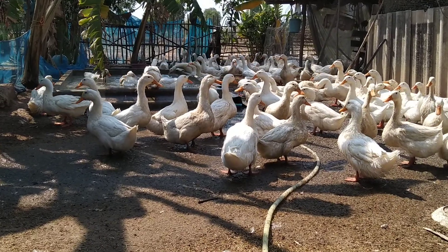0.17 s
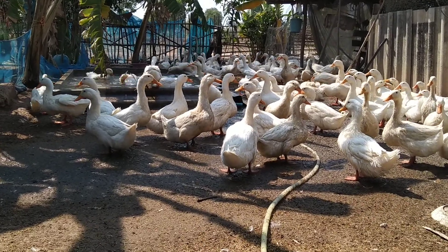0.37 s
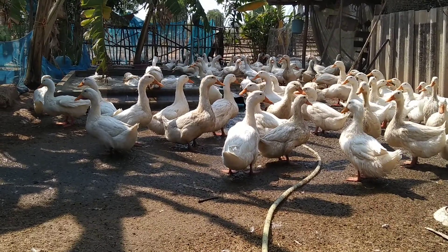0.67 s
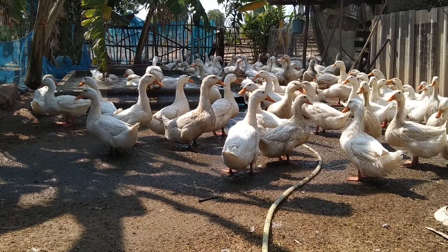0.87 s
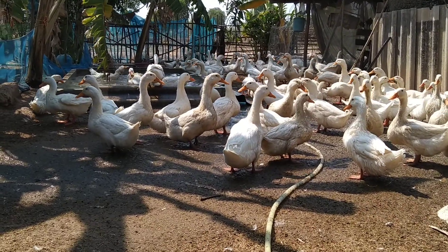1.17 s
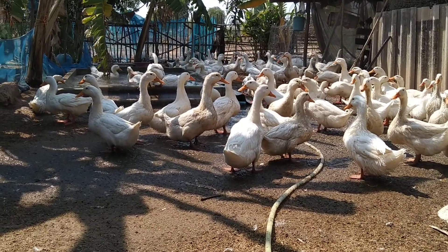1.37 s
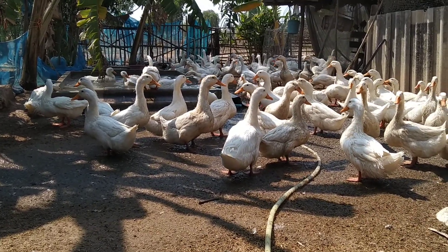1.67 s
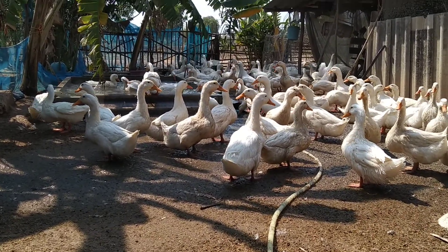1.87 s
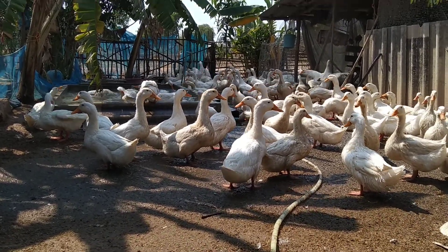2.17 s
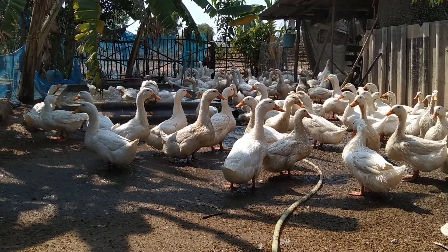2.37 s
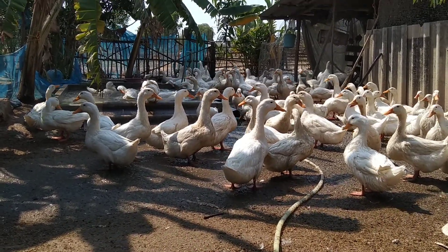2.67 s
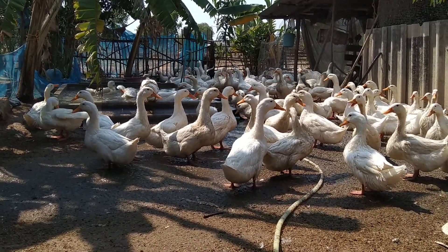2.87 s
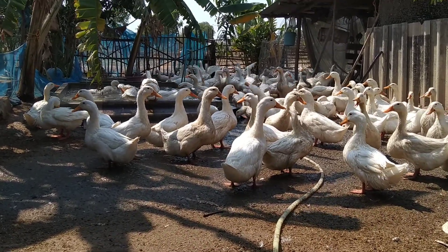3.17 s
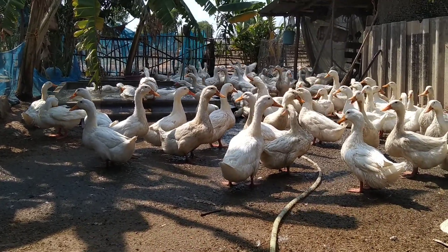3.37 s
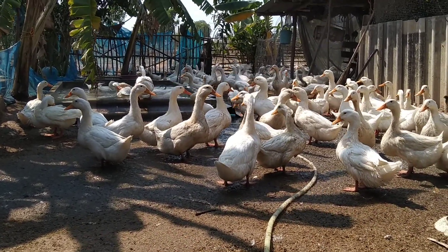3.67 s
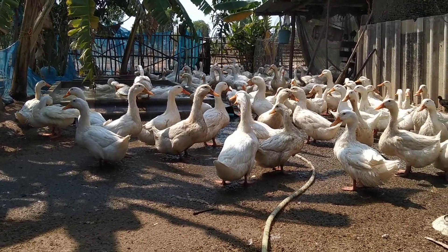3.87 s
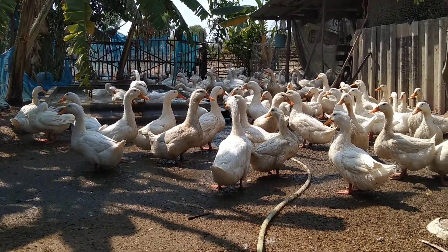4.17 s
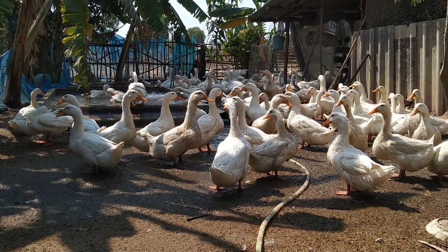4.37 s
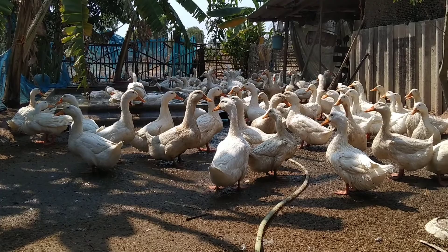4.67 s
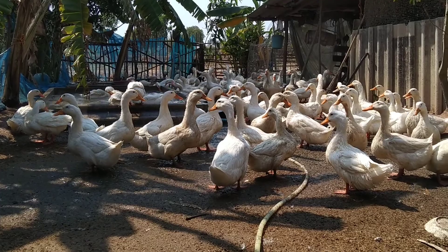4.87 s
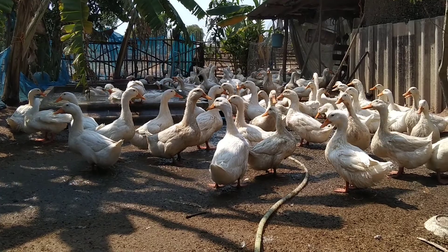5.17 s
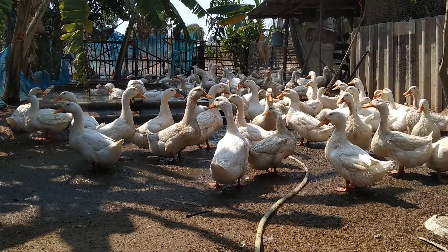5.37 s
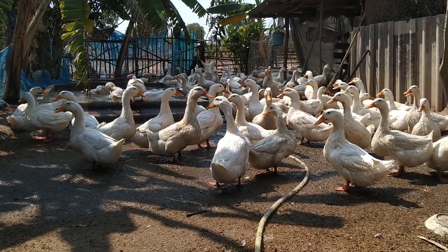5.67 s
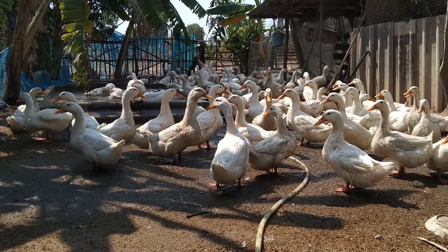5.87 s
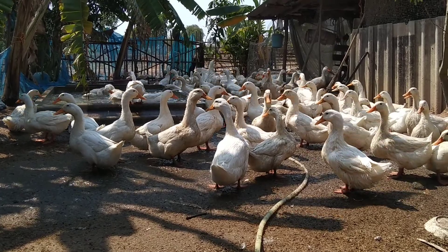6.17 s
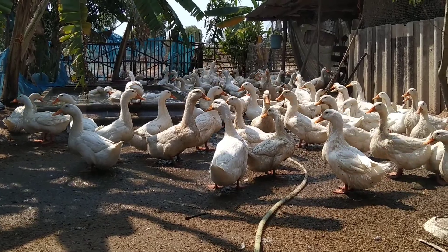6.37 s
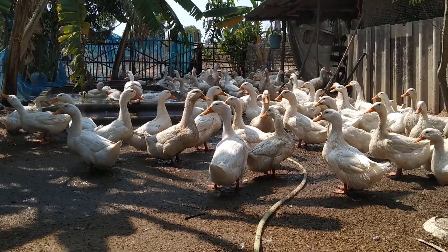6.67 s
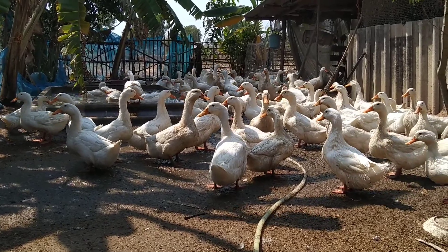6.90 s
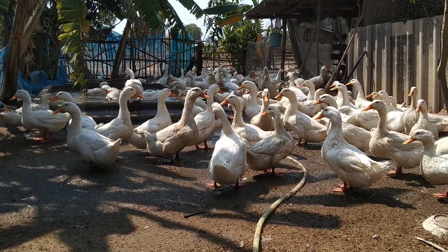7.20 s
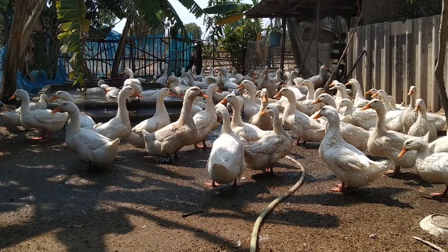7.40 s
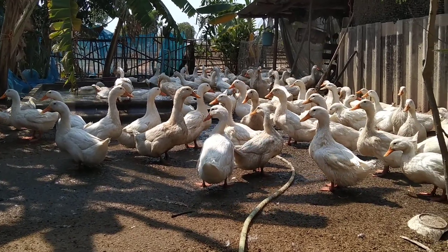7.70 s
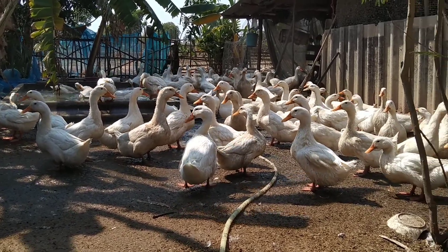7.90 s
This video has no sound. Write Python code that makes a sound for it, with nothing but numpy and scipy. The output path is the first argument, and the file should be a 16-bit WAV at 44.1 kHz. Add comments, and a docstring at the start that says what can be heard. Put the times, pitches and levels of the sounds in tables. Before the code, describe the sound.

Dense hoarse duck chatter, rough and nasal, starts at full strength. Grunts, soft honks and quick squeals dot it, then it drops to faint whistling for a moment and resumes. The second half is patchier, with buzzing calls, tiny chirps and a loud squeal before strong quacks return. Mono phone sound outdoors, mid-heavy with little bass or top, brief echoes and far flock babble nearly erased by noise suppression.

```python
"""Hoarse quacks and low grunts of a near flock of ducks in a farmyard, heard through a phone.
Pulsed voices ring throat and chest resonances; air hisses past the bills. Tones make murmurs, whistled notes,
honks and squawks; resonant noise makes chirrs and chirps; short noise bursts make bill clicks and knocks.
Behind them far birds babble steadily as coloured puffs of air; near calls echo off fences and a shed.
The phone's noise suppressor takes the babble for noise and carves most of it away."""
import sys
import numpy as np
from scipy import signal
from scipy.fft import rfft, irfft, next_fast_len
from scipy.io import wavfile
from scipy.ndimage import uniform_filter1d

SR = 44100
rng = np.random.default_rng(int(sys.argv[2]) if len(sys.argv) > 2 else 0)


def unload_wav(signal):
    """Save mono or channel-first audio to the path in sys.argv[1] as 16-bit WAV at rate SR, clipped to [-1, 1]."""
    wavfile.write(
        sys.argv[1],
        SR,
        np.round(np.clip(np.atleast_2d(signal).T, -1, 1) * 32767).astype(np.int16),
    )


N = 354563


def gain_of(db):
    """Decibels to an amplitude factor."""
    return 10 ** (np.asarray(db) / 20)


def evened(x):
    """Scales to rms 1."""
    return x / np.sqrt(np.mean(x ** 2) + 1e-20)


def levelled(x, size=3000):
    """Holds the running rms near 1, leaving only the fast grain."""
    power = uniform_filter1d(uniform_filter1d(x ** 2, size), size)
    return x / np.sqrt(abs(power) + 1e-20)


def curves(rows):
    """Sample times, then each further column joined by straight lines."""
    time_s, *columns = np.transpose(rows)
    t = np.arange(round(time_s[0] * SR), min(round(time_s[-1] * SR), N)) / SR
    return t, *(np.interp(t, time_s, column) for column in columns)


def add(mix, start_s, sound):
    """Mixes a sound in at start_s, cut at the end of the mix."""
    part = mix[round(start_s * SR):][:len(sound)]
    part += sound[:len(part)]


def drift(size):
    """Slow random curve of rms 1, smoothed twice over size samples."""
    step = 20  # samples per coarse point
    coarse = rng.standard_normal(N // step + 2)
    coarse = uniform_filter1d(uniform_filter1d(coarse, size // step), size // step)
    return np.interp(np.arange(N) / step, np.arange(len(coarse)), evened(coarse))


def colour(x, points):
    """Filters by a gain curve (frequency [Hz], gain [dB]) on a log-frequency axis."""
    hz, db = np.transpose(points)
    size = next_fast_len(N)
    bin_hz = np.fft.rfftfreq(size, 1 / SR) + 1
    gain = gain_of(np.interp(np.log(bin_hz), np.log(hz), db))
    return irfft(rfft(x, size) * gain, size)[:N]


def band(x, lo_hz, hi_hz):
    """Steep band-pass."""
    return signal.sosfilt(signal.butter(4, [lo_hz, hi_hz], "band", fs=SR, output="sos"), x)


def resonate(x, hz, width_hz):
    """Moving resonance: shifts hz down to zero, smooths with a double pole, shifts back."""
    turn = np.exp(2j * np.pi * np.cumsum(hz * np.ones(len(x))) / SR)
    r = np.exp(-np.pi * width_hz / SR)
    smooth = signal.lfilter([(1 - r) ** 2], [1, -2 * r, r * r], x * turn.conj() + 1e-18)
    return 2 * (turn * smooth).real


def ring(drive, hz, modes, fickle_db):
    """Narrow modes on a common frequency hz; each wanders in pitch and swells and fades at random."""
    out = np.zeros(N)
    for k, (factor, width_hz, db) in enumerate(modes):
        wander = 1 + .018 * drift(size=3000)
        gain = gain_of(db + fickle_db * drift(size=900))
        out += (-1) ** k * gain * evened(resonate(drive, hz * factor * wander, width_hz))
    return out


def syrinx(hz, rough, count):
    """Birds pulsing at once, rough = share of air puffs; the first leads, others come and go."""
    out = np.zeros(N)
    for k in range(count):
        jitter = 1 + .1 * k * drift(size=6000) + .06 * drift(size=300)
        turns = np.cumsum(hz * 1.37 ** k * jitter) / SR
        pulses = np.diff(np.floor(turns), prepend=0) * gain_of(1.6 * rng.standard_normal(N))
        puffs = np.exp(-(turns % 1) / .35) * rng.standard_normal(N)
        presence = gain_of(k * (3 * drift(size=4000) - 2.5))
        out += presence * ((1 - rough) * evened(pulses) + rough * evened(puffs))
    return out


def scattered(x):
    """Blurs each pulse with short random delays whose gains drift."""
    out = x.copy()
    for lag in np.arange(30, 330, 45):  # samples
        delay_gain = gain_of(-5 - 60 * lag / SR / .04) * drift(size=1200)
        out += delay_gain * np.roll(x, lag + rng.integers(40))
    return out


def whistle(t, hz, partials):
    """Partials (multiple, level [dB]) on a wavering pitch, with an uneven throb."""
    pitch_waver, level_waver = uniform_filter1d(rng.standard_normal((2, len(t))), 250, axis=1) * 16
    turns = np.cumsum(hz * (1 + 0.01 * pitch_waver)) / SR
    tone = sum(gain_of(db) * np.sqrt(2) * np.sin(2 * np.pi * k * turns) for k, db in partials)
    return tone * (1 + 0.21 * level_waver) * signal.windows.tukey(len(t), .3)


def call(length_s, start_db, end_db):
    """Times, share of the length, and a level bend in dB through 0 at 45 % of the length."""
    t = np.arange(0, length_s, 1 / SR)
    share = t / length_s
    return t, share, np.interp(share, [0, 0.45, 1], [start_db, 0, end_db])


def spoken(calls):
    """Attack, hold and fade: power-weighted resonance [Hz], then summed effort and side-layer gains."""
    power = np.full((len(calls[0]) - 5, N), 1e-12)  # effort, then one row per side layer
    pull = np.full(N, 1e-12 * calls[0][5])
    for start_s, attack_s, hold_s, effort_db, fade_db_per_s, hz, *sides_db in calls:
        t = np.arange(0, attack_s + hold_s + 70 / fade_db_per_s, 1 / SR)
        rise = np.minimum(t / max(attack_s, .006), 1) ** .75
        fade_db = fade_db_per_s * np.maximum(t - attack_s - hold_s, 0)
        shape = (rise * gain_of(effort_db - fade_db)) ** 2
        add(pull, start_s, hz * shape)
        for layer, db in zip(power, [0, *sides_db]):
            add(layer, start_s, shape * gain_of(2 * db))
    return uniform_filter1d(pull / power[0], size=300), *np.sqrt(power)


# far-flock spectrum: (frequency [Hz], filter gain [dB])
BABBLE_SPECTRUM = [(59, -55), (100, -31), (283, -10.5), (642, -9.5), (1510, -9), (4520, -17), (7330, -21.5),
                   (8500, -54), (11000, -55.5), (18700, -120)]
BABBLE_RMS_DB = -54.5


def babble():
    """Far birds blur into steady, coloured puffs of air."""
    far = colour(levelled(syrinx(90, 0.99, count=2)), BABBLE_SPECTRUM)
    return gain_of(BABBLE_RMS_DB) * evened(far)


def yard(x):
    """Sparse echoes of random sign from fences and the shed."""
    t60_s = .28
    at = np.arange(400, 12000, 20) + rng.integers(0, 20, 580)  # samples
    taps = np.zeros(12100)
    taps[at] = rng.choice([-1., 1.], len(at)) * gain_of(-60 * at / SR / t60_s)
    return signal.oaconvolve(x, taps / np.linalg.norm(taps))[:N]


def snaps(rows, lo_hz, hi_hz):
    """Band-passed noise bursts with a 22 ms 60 dB decay, each scaled to its peak."""
    out, t = np.zeros(N), np.arange(1600) / SR
    for start_s, peak_db in rows:
        snap = band(rng.standard_normal(len(t)) * gain_of(-60 * t / .022), lo_hz, hi_hz)
        add(out, start_s, gain_of(peak_db) * snap / abs(snap).max())
    return out


# bills snapping: (time [s], peak [dB])
BILL_CLICKS = [(0.3713, -38), (0.9707, -40), (1.0876, -38), (1.4077, -41), (2.3227, -39.5), (2.4429, -36.5),
               (3.033, -33), (4.6383, -36), (4.7232, -37.5), (4.8694, -33.5), (5.016, -42), (5.0958, -42),
               (7.849, -44), (7.9696, -37.5)]


def clicks():
    """Snapping bills: high bursts."""
    return snaps(BILL_CLICKS, 5000, 9000)


# dull wide snaps: (time [s], peak [dB])
DULL_KNOCKS = [(2.845, -50), (2.871, -44), (4.775, -39.5), (4.955, -36), (5.517, -38)]


def knocks():
    """Dull snaps: lower and wider bursts."""
    return snaps(DULL_KNOCKS, 250, 5000)


# small bird's chirps: (time [s], nominal level [dB], played 10 dB lower)
CHIRPS = [(5.764, -44), (5.831, -45), (5.895, -50.5), (5.907, -45)]


def tweets():
    """A small bird's chirps: a falling tone in resonant noise, fading fast."""
    out, t = np.zeros(N), np.arange(1600) / SR
    for start_s, db in CHIRPS:
        hz = 6000 + 1150 * np.exp(-t / 0.019)
        rasp = evened(resonate(rng.standard_normal(len(t)), hz, 500)) * signal.windows.tukey(len(t), .3)
        add(out, start_s, gain_of(db - 10 - 260 * t) * (whistle(t, hz, [(0.98, 0)]) + 2.7 * rasp))
    return out


# clear low calls: (start [s], length [s], first pitch [Hz], last pitch [Hz], nominal level [dB])
MURMUR_CALLS = [(3.455, 0.14, 168.8, 170.8, -61.5), (5.423, 0.22, 272.8, 260.7, -57.5),
                (5.592, 0.28, 335.4, 331.3, -66.5)]
# nearly closed bill: (frequency [Hz], partial level [dB])
BILL_COLOUR = [(170, -36.5), (340, -3), (700, -8.5), (1050, -5.5), (1450, 3.5), (1900, -7.5), (2400, -20.5),
               (3000, -17.5)]


def murmurs():
    """Steady harmonic stacks through a nearly closed bill, each partial with a random level offset."""
    out, (colour_hz, colour_db) = np.zeros(N), np.transpose(BILL_COLOUR)
    for start_s, length_s, first_hz, last_hz, db in MURMUR_CALLS:
        t, share, bend_db = call(length_s, 1.5, -1.2)
        partials = []
        for k in range(1, 17):
            if k * first_hz < 3000:
                partial_db = np.interp(k * first_hz, colour_hz, colour_db) + 3 * rng.standard_normal()
                partials.append((k, partial_db))
        hz = first_hz + (last_hz - first_hz) * share
        add(out, start_s, gain_of(db + bend_db) * whistle(t, hz, partials))
    return out


# honks: (start [s], length [s], top fundamental [Hz], nominal level [dB])
HONK_CALLS = [(1.796, 0.11, 1034, -61), (1.934, 0.14, 1037, -54), (2.111, 0.19, 998, -58.5)]
# honk spectrum, no fundamental: (multiple, level [dB])
HONK_STACK = [(2, 5), (3, -26.5), (4, -1), (5, 3), (6, -40), (7, 7)]


def honks():
    """Upper partials on an arched pitch, swelling and dying away."""
    out = np.zeros(N)
    for start_s, length_s, top_hz, db in HONK_CALLS:
        t, share, swell_db = call(length_s, -10.5, -28.5)
        arch = 1 - 0.042 * (2 * share - 1) ** 2  # 4.2 % lower at both ends
        add(out, start_s, gain_of(db + swell_db) * whistle(t, top_hz * arch, HONK_STACK))
    return out


# whistled notes: (start [s], length [s], first pitch [Hz], last pitch [Hz],
#                  level at 45 % of the length [dB], second partial re first [dB])
WHISTLED_NOTES = [ (2.087, 0.018, 3234, 2424, -50.5, -32), (2.131, 0.03, 308, 279, -43.5, -14.5),
                  (2.701, 0.0052, 2560, 3160, -45.5, -41.5), (2.672, 0.014, 1730, 1700, -48.5, -33.5),
                  (2.797, 0.03, 990, 820, -46, -23), (2.83, 0.041, 780, 855, -41.5, -30),
                  (3.301, 0.098, 3270, 3310, -64.5, -10.5), (3.242, 0.12, 808, 780, -59.5, -29),
                  (3.304, 0.082, 3600, 3510, -64, -24), (3.47, 0.15, 1880, 1837, -60, -34),
                  (3.579, .11, 1050, 1035, -59, -28), (3.681, 0.098, 3250, 3240, -64.5, -36),
                  (3.362, 0.3, 343.8, 299, -64, -10.5), (3.449, 0.12, 997, 1025, -59.5, -19),
                  (3.466, 0.13, 1468, 1523, -51, -39.5), (3.501, 0.14, 3240, 3340, -66, -41),
                  (3.629, 0.082, 2823, 2813, -54.5, -8.5), (3.585, 0.12, 514, 556, -63, -3),
                  (3.778, 0.024, 760, 743, -60.5, -9), (3.681, 0.078, 1070, 1282, -56, -19.5),
                  (3.85, 0.081, 2920, 2960, -50.5, -4.5), (4.016, 0.078, 4390, 3520, -57, -34),
                  (4.324, 0.085, 3136, 2870, -56.5, -3.5), (4.459, 0.044, 277, 257, -49, -6.5),
                  (4.918, 0.165, 3960, 3960, -64.5, -28), (6.326, .07, 3870, 3330, -56.5, -29.5),
                  (6.391, 0.088, 4250, 4180, -63, -29), (5.234, 0.075, 4330, 4315, -68.5, -40),
                  (5.635, 0.3, 699, 714, -62.5, -27), (5.712, 0.29, 3000, 3225, -61.5, -28),
                  (5.749, 0.19, 1715, 1694, -60.5, -33), (5.988, 0.084, 345, 350, -61.5, -35),
                  (6.13, 0.043, 346, 305, -54, -10), (6.459, 0.06, 289, 337, -58, -11),
                  (6.511, 0.089, 2710, 2487, -43.5, -15.5), (6.536, 0.091, 2950, 3250, -48.5, -7.5),
                  (6.508, 0.12, 1355, 1290, -54.5, -24), (6.842, 0.065, 2413, 2300, -47, -40),
                  (6.896, 0.11, 2900, 3290, -58.5, -30), (7.037, 0.066, 2880, 2467, -47.5, -18),
                  (7.108, 0.057, 2315, 2350, -49, -19.5), (7.346, 0.054, 299, 293.5, -57.5, -5.5), ]
THIRD_RE_SECOND_DB = 4.5


def notes():
    """Three partials gliding in pitch; the level sinks through each note."""
    out = np.zeros(N)
    for start_s, length_s, first_hz, last_hz, db, second_db in WHISTLED_NOTES:
        t, share, bend_db = call(length_s, 3.5, -2.5)
        partials = [(1, 0.0044), (2, second_db), (3, second_db + THIRD_RE_SECOND_DB)]
        hz = first_hz + (last_hz - first_hz) * share
        add(out, start_s, gain_of(db + bend_db) * whistle(t, hz, partials))
    return out


# raspy calls: (start [s], nominal level [dB], played 15 dB lower, buzz t60 [s], top resonance [Hz])
RASPY_CALLS = [(5.654, -42.5, 0.45, 4370), (5.879, -37.5, 0.23, 4630), (6.016, -40.5, 0.26, 4200),
               (6.236, -41, 0.17, 4490), (6.72, -39, 0.25, 4440), (6.9523, -38, 0.14, 4440),
               (7.1002, -35.5, 0.13, 4420), (7.3214, -42.5, 0.29, 4500), (7.82, -39.5, 0.25, 4140)]


def chirrs():
    """Buzzing air in a resonance that shoots up and a fixed one below; a tone starts the call."""
    out, t = np.zeros(N), np.arange(9000) / SR
    for start_s, db, t60_s, top_hz in RASPY_CALLS:
        air = rng.standard_normal(len(t)) * (1 + 0.44 * np.sin(2 * np.pi * 130 * t))
        hz = top_hz - 1500 * np.exp(-t / 0.008)
        sweep = evened(resonate(air, hz, 360))
        lower = gain_of(-3.5) * evened(resonate(air, top_hz - 750, 400))
        tone = gain_of(9 - 230 * t) * whistle(t, hz, [(1, 0)])
        fade = gain_of(db - 15.0 - 60 * t / t60_s) * signal.windows.tukey(len(t), .03)
        add(out, start_s, fade * (sweep + lower + tone))
    return out


# bending squawks, one list each: (time [s], pitch [Hz], level [dB])
SQUAWK_BENDS = [
    [(0.526, 4350, -55), (0.546, 4250, -51), (0.553, 4187, -64.5), (0.56, 3950, -49.5),
     (0.582, 3720, -50.5), (0.59, 3650, -67), (0.602, 3467, -49.5), (0.628, 3230, -54)],
    [(1.07, 3660, -60), (1.08, 3390, -49.5), (1.094, 2684, -48), (1.1, 2500, -59)],
    [(1.303, 3220, -49), (1.312, 3350, -43), (1.33, 2196, -51.5), (1.336, 1870, -59.5), (1.346, 1810, -56),
     (1.352, 2620, -54), (1.366, 3520, -55)],
    [(2.641, 2617, -49.5), (2.651, 2960, -45), (2.659, 2700, -46.5), (2.668, 2380, -54)],
    [(4.745, 1034, -60), (4.79, 1023, -48.5), (4.82, 844, -47.5), (4.86, 839, -52), (4.88, 806, -57)],
    [(4.79, 3116, -64), (4.81, 3236, -52.5), (4.88, 3063, -59.5), (4.97, 2880, -58)],
    [(5.065, 3150, -74.5), (5.1, 3306, -58), (5.16, 3028, -63), (5.2, 2850, -61), (5.36, 2720, -73.5)],
    [(5.13, 1328, -52), (5.19, 1250, -60.5), (5.21, 1180, -54.5), (5.28, 1142, -65)],
    [(5.172, 2010, -56.5), (5.2, 1800, -45.5), (5.24, 2082, -46.5), (5.265, 2350, -67.5),
     (5.3, 1966, -51.5)],
    [(6.575, 2734, -43.5), (6.61, 2822, -38.5), (6.635, 2732, -39.5), (6.665, 2508, -41.5),
     (6.7, 2477, -39), (6.74, 2360, -46)],
]
# second partial of each squawk: (level re first [dB])
OVERTONE_DB = [-17.5, -12, -24, -20.5, -12, -2, 3.5, -22.5, -33, -10]
BREATH_DB, BREATH_WIDTH_HZ = -3, 260


def squawks():
    """A bending tone and its overtones, with breath ringing along the lowest two partials."""
    out = np.zeros(N)
    for rows, overtone_db in zip(SQUAWK_BENDS, OVERTONE_DB):
        t, hz, db = curves(rows)
        partials = [(1, 0.012), (2, overtone_db), (3, overtone_db - 2.5)]
        air = rng.standard_normal(len(t))
        breath = np.zeros(len(t))
        for k, partial_db in partials[:2]:
            breath += gain_of(partial_db) * evened(resonate(air, k * hz, BREATH_WIDTH_HZ))
        breath *= gain_of(BREATH_DB) * signal.windows.tukey(len(t), .3)
        add(out, t[0], gain_of(db) * (whistle(t, hz, partials) + breath))
    return out


# closed-bill grunts: (start [s], attack [s], hold [s], effort [dB], fade [dB/s],
#                      chest resonance [Hz], bass re effort [dB]); rise takes at least 6 ms
GRUNT_CALLS = [(0.018, 0.0048, 0.068, -48.5, 110.5, 232, -3),
               (0.337, 0.0058, 0.049, -50.5, 236.5, 474, -14), (0.546, 0.013, 0.0063, -44.5, 303, 610, -13),
               (0.688, 0.0068, 0.051, -46.5, 287.5, 575, -20.5),
               (0.815, 0.0021, 0.035, -51.5, 173.5, 448, -27),
               (1.097, 0.031, 0.15, -51.5, 200.5, 461, -6.5), (1.424, 0.0051, 0.11, -52, 156, 482, -9.5),
               (1.631, 0.018, 0.028, -56.5, 147, 407, -21.5), (1.752, 0.015, 0.12, -60.5, 118, 550, -27),
               (2.044, 0.019, 0.02, -47.5, 290, 553, -42), (2.171, 0.058, 0.036, -43, 256, 602, -15),
               (2.301, 0.014, 0.073, -48.5, 247, 431, -25), (2.424, 0.019, 0.13, -46.5, 76, 519, -7.5),
               (2.685, 0.024, 0.038, -59.5, 267, 379, -11.5), (2.752, 0.011, 0.09, -46.5, 305.5, 785, -2.5),
               (2.935, 0.011, 0.024, -47, 245, 508, -10), (3.019, 0.0043, 0.041, -48.5, 61, 368, -5.5),
               (3.449, 0.035, 0.12, -81.5, 159, 302, -23), (3.791, 0.056, 0.028, -47, 136.5, 484, -3),
               (4.087, 0.055, 0.014, -52.5, 230, 438, -21), (4.194, 0.045, 0.019, -47.5, 285.5, 621, -6.5),
               (4.622, 0.0047, 0.016, -54.5, 426, 894, -30.5), (4.702, 0.029, 0.05, -46, 281, 866, -5.5),
               (4.915, 0.031, 0.017, -49.5, 265, 554, -4.5), (5.032, 0.017, 0.017, -56.5, 271, 637, -22),
               (5.292, 0.013, 0.023, -46.5, 402.5, 750, -13), (5.628, 0.0041, 0.018, -56, 129.5, 780, -35),
               (6.125, 0.0063, 0.079, -58, 194.5, 330, -32), (6.462, 0.01, 0.075, -56.5, 296, 324, -18.5),
               (6.75, 0.038, 0.028, -46.5, 250.5, 364, -8.5), (7.083, 0.0099, 0.061, -54.5, 273, 289, 10),
               (7.217, 0.0059, 0.072, -60, 288, 778, -18.5), (7.485, 0.0022, 0.0047, -47, 261, 610, -1.5),
               (7.702, 0.0054, 0.038, -61, 338.5, 652, 2.5), (7.966, 0.023, 0.039, -54.5, 252, 467, -30.5)]
# chest modes: (factor on chest resonance, width [Hz], nominal level [dB])
CHEST_MODES = [(0.599, 119, -10.5), (1.007, 175, 3.5), (1.602, 161, -4)]


def grunts():
    """Rougher pulses ring low in the chest; some shake bass loose."""
    hz, effort, bass_gain = spoken(GRUNT_CALLS)
    drive = syrinx(100 * (1 + .2 * drift(size=5000)), 0.41, count=2)
    chest = ring(drive, hz, CHEST_MODES, 6.37) + gain_of(8.5) * evened(band(drive, 147.6, 1323))
    bass = band(rng.standard_normal(N), 70, 185)
    return effort * levelled(chest) + bass_gain * levelled(bass)


TOP_FLOOR_DB = -69.5  # the whole flock's top hiss between near quacks


def hiss(rasp_gain, top_gain):
    """Turbulent air throbs with its own pulses and rings faintly at the bill's edges."""
    air = syrinx(120, 1.0, count=2) + 2.4 * rng.standard_normal(N)
    rasp = ring(air, 5140, [(.93, 338, 0.031), (1, 358, 0), (1.07, 340, 0.03)], 4.4)
    rasp += gain_of(-0.5) * evened(band(air, 4400, 4740))
    edges = ring(air, 6800, [(.89, 380, -2), (1, 380, 1), (1.09, 380, -2)], 4.)
    edges += gain_of(1) * evened(band(air, 5080, 8600))
    top = levelled(edges) + gain_of(1.5) * levelled(band(air, 8400, 13000))
    return rasp_gain * levelled(rasp) + (top_gain + gain_of(TOP_FLOOR_DB)) * top


# near quacks: (start [s], attack [s], hold [s], effort [dB], fade [dB/s], throat resonance [Hz],
#               upper throat, rasp, top hiss, each re effort [dB]); rise takes at least 6 ms
QUACK_CALLS = [(0.0, 0.0022, 0.14, -40, 252, 1482, -14, -18, -29),
               (0.17, 0.037, 0.02, -39, 199, 1592, -9.5, -14.5, -16.5),
               (0.335, 0.081, 0.037, -38, 319, 1588, -8.5, -10.5, -27),
               (0.543, 0.064, 0.12, -41, 247, 1458, -20, -24, -33.5),
               (0.793, 0.01, 0.057, -45.5, 248, 1398, -16.5, -45, -25.5),
               (0.885, 0.01, 0.13, -42, 350, 1590, -14.5, -20, -30),
               (1.094, 0.008, 0.16, -41, 217.5, 1496, -14, -23, -34),
               (1.31, 0.0064, 0.055, -52, 301, 1680, -2, -39, -12.5),
               (1.397, 0.014, 0.037, -41, 118.3, 1506, -11, -19, -30),
               (1.642, 0.0048, 0.19, -42, 311, 1579, -18, -22, -34),
               (1.922, 0.0061, 0.096, -54, 250, 2245, -3, -9.5, -7),
               (2.04, 0.0039, 0.055, -49.5, 242, 1380, -8, -38, -28.5),
               (2.109, 0.018, 0.043, -45, 246, 1673, -6.5, -10.5, -16.5),
               (2.181, 0.059, 0.015, -41, 171, 1325, -14, -21, -26.5),
               (2.313, 0.0069, 0.056, -46, 198, 1256, -13, -16.5, -26),
               (2.425, 0.02, 0.07, -41.5, 209, 1347, -9, -19.5, -22),
               (2.533, 0.004, 0.037, -38.5, 138.4, 1364, -14, -21, -23.5),
               (2.729, 0.035, 0.018, -38, 246, 1262, -9, -25, -22),
               (2.831, 0.006, 0.027, -42, 296, 1210, -13.5, -25, -47),
               (2.91, 0.066, 0.053, -47.5, 196, 1227, -8, -24.5, -27),
               (2.996, 0.026, 0.035, -38.5, 260, 1426, -12.5, -20, -18),
               (3.106, 0.021, 0.026, -45.5, 154, 1410, -7, -15, -15),
               (3.457, 0.019, 0.15, -64.5, 264, 1464, -7.5, -45, -14),
               (3.62, 0.0042, 0.036, -77.5, 387, 1210, 15, -20.5, -14.5),
               (3.819, 0.0047, 0.054, -42, 193, 1338, -9.5, -18.5, -25.5),
               (3.93, 0.0033, 0.12, -46.5, 194, 1540, -8.5, -13, -18.5),
               (4.069, 0.054, 0.01, -39.5, 240, 1820, -12, -13, -16),
               (4.148, 0.061, 0.045, -40.5, 259, 1288, -11, -20.5, -25),
               (4.36, 0.0066, 0.047, -48.5, 240, 1955, -10.5, -17, -25),
               (4.431, 0.011, 0.08, -42, 202, 1357, -15.5, -21.5, -23.5),
               (4.6, 0.0063, 0.089, -46.5, 247, 1510, -13.5, -17.5, -22.5),
               (4.71, 0.011, 0.053, -48.0, 173, 1244, -10, -20.5, -38),
               (4.899, 0.0088, 0.019, -45, 101.3, 1583, -11.5, -18.5, -26.5),
               (5.007, 0.0064, 0.12, -54.5, 198, 1780, -14.5, -28.5, -11.5),
               (5.156, 0.039, 0.042, -69.5, 317, 1950, -16.5, -14.5, -4),
               (5.273, 0.027, 0.02, -45.5, 291, 1448, -26.5, -26, -22),
               (5.397, 0.048, 0.074, -45.5, 169, 1434, -13.5, -23, -17),
               (5.604, 0.0075, 0.12, -50.5, 138.6, 1370, -17, -20.5, -21.5),
               (5.7, 0.019, 0.23, -67.5, 291, 1790, 13, -1, 10.5),
               (6.075, 0.0048, 0.044, -51.5, 140, 1984, -8.5, -13, -9),
               (6.079, 0.081, 0.023, -48.5, 232.5, 1546, -27, -26, -24),
               (6.24, 0.01, 0.062, -56.5, 249, 1590, -2.5, -18.5, -8),
               (6.334, 0.0033, 0.09, -51, 215.3, 1500, -5.5, -39, -20),
               (6.464, 0.047, 0.05, -46, 266, 2330, 0, -19, -12.5),
               (6.615, 0.006, 0.062, -55, 274, 2590, -9, -4.5, -8),
               (6.752, 0.0022, 0.067, -42, 153, 1538, -10, -16, -17.5),
               (6.96, 0.021, 0.047, -44, 209, 1827, -8, -10.5, -18),
               (7.096, 0.0031, 0.075, -45.5, 156.3, 1438, -11, -22.5, -28.5),
               (7.25, 0.06, 0.11, -42, 198, 2006, -14.5, -23, -38.5),
               (7.37, 0.063, 0.051, -39.5, 199, 1724, -11.5, -17.5, -19),
               (7.483, 0.03, 0.094, -39, 260, 2008, -11.5, -13, -21),
               (7.684, 0.008, 0.056, -44, 160, 1394, -12, -16.5, -17.5),
               (7.978, 0.018, 0.075, -42.5, 250, 1310, -13, -23, -17)]
# leading voice: (time [s], pulse rate [1/s], upper resonance [Hz])
LEADING_VOICE = [(0.0, 86, 3470), (0.38, 107, 3910), (1.14, 98, 2890), (1.59, 94, 2840), (1.88, 86, 3750),
                 (2.33, 100, 3274), (2.62, 105.6, 3360), (2.98, 81.6, 3320), (3.96, 152, 2935),
                 (4.5, 122, 3765), (4.75, 111, 2740), (5.6, 73, 3475), (6.34, 169, 3740),
                 (6.65, 102.5, 3190), (7.17, 91.4, 2860), (7.57, 122, 3400), (7.84, 94, 4460),
                 (8.04, 84, 3270)]
# windpipe modes: (factor on throat resonance, width [Hz], nominal level [dB])
THROAT_MODES = [(0.762, 245, -2.5), (0.993, 227, 3), (1.244, 256, -4), (1.555, 285, -3.5),
                (1.763, 271, -11)]
# upper modes: (factor on upper resonance, width [Hz], nominal level [dB])
UPPER_MODES = [(0.857, 345, -12), (1.003, 382, 1), (1.167, 416, -4)]


def quacks():
    """Pulses ring the modes of a moving throat, low and high; air hisses past the bill."""
    hz, effort, upper_gain, rasp_gain, top_gain = spoken(QUACK_CALLS)
    rate_hz, upper_hz = (np.pad(x, (0, N - len(x)), "edge") for x in curves(LEADING_VOICE)[1:])
    drive = scattered(syrinx(rate_hz, .2, count=3))
    throat = ring(drive, hz, THROAT_MODES, 2.95) + gain_of(-3.5) * evened(band(drive, 1070, 3400))
    upper = ring(drive, upper_hz, UPPER_MODES, 3.5) + gain_of(0.5) * evened(band(drive, 2700, 4100))
    voice = effort * levelled(band(throat, 827, 2820)) + upper_gain * levelled(upper)
    return voice + hiss(rasp_gain, top_gain)


def scene():
    """Far babble, near birds and their echoes."""
    far = babble()
    clear = clicks() + knocks() + tweets() + honks() + notes() + chirrs() + squawks()
    hoarse = murmurs() + grunts() + quacks()
    echoes = yard(gain_of(-7) * hoarse + gain_of(-13) * clear)  # clear calls echo more faintly
    return (far + echoes + clear + hoarse)[None]


def suppressed(x):
    """Noise suppressor: subtracts each bin's usual quiet power, cutting by 27 dB at most."""
    hz, _, z = signal.stft(x, SR, nperseg=1024, noverlap=768)
    power = uniform_filter1d(abs(z) ** 2, size=5, axis=0) + 1e-20
    hold = np.exp(-256 / SR / 0.025)  # 25 ms lag: bins close slowly
    power = signal.lfilter([1 - hold], [1, -hold], power, axis=1)
    noise = uniform_filter1d(np.percentile(power, 12, axis=1), size=9)
    strength = np.where(hz < 5700, 1.5, .55)  # gentler on the top band
    keep = np.clip(1 - (strength * noise)[:, None] / power, gain_of(-27), 1)
    return signal.istft(z * keep, nperseg=1024, noverlap=768)[1][:N]


# microphone response: (frequency [Hz], gain [dB])
MIC_RESPONSE = [(40, -42), (120, -22.5), (260, 0), (7600, -2), (8300, -21.5), (9000, -35.5), (11000, -38),
                (15000, -38)]
# phone's faint low noise: (frequency [Hz], filter gain [dB])
RUMBLE_SPECTRUM = [(20, -17.5), (60, -2), (120, 5), (250, -3.5), (500, -36.5)]
SELF_NOISE_DB, RUMBLE_RMS_DB, EDGE_HZ = -93, -101, 15400


def record(dry):
    """Phone: suppressor, microphone colour, self-noise and rumble, then the band limit."""
    out = colour(suppressed(dry[0]), MIC_RESPONSE)
    out += gain_of(SELF_NOISE_DB) * rng.standard_normal(N)
    out += gain_of(RUMBLE_RMS_DB) * evened(colour(rng.standard_normal(N), RUMBLE_SPECTRUM))
    low_pass = signal.firwin(511, EDGE_HZ, window=("kaiser", 9), fs=SR)
    return signal.oaconvolve(out, low_pass, "same")[None]


dry = scene()
out = record(dry)
unload_wav(out)
```